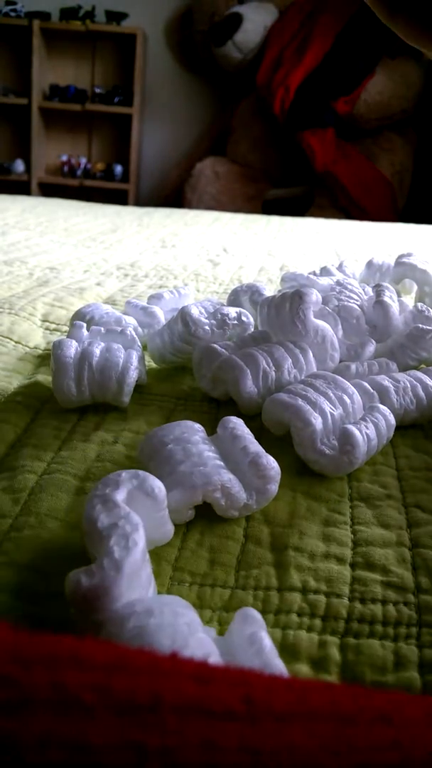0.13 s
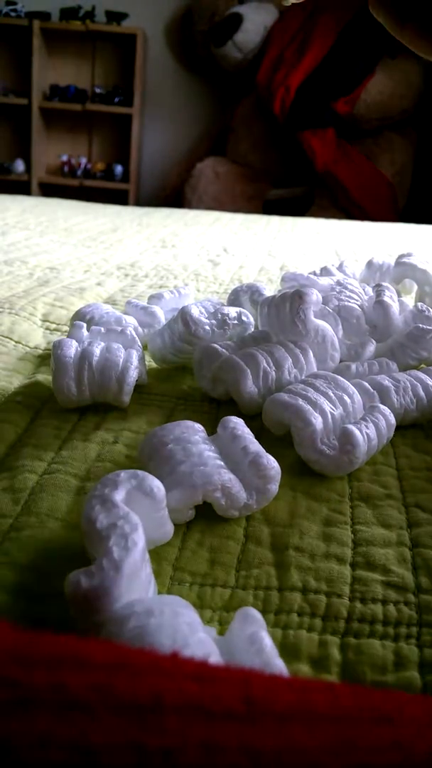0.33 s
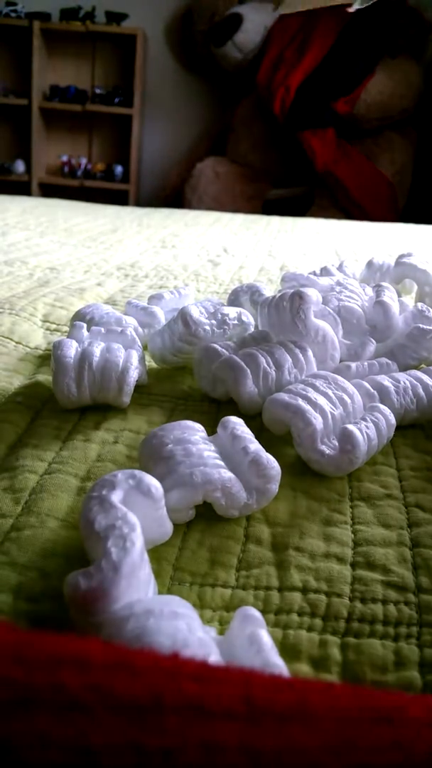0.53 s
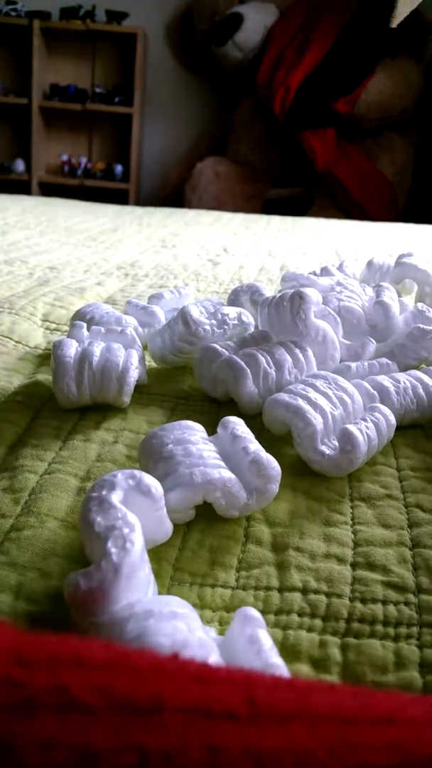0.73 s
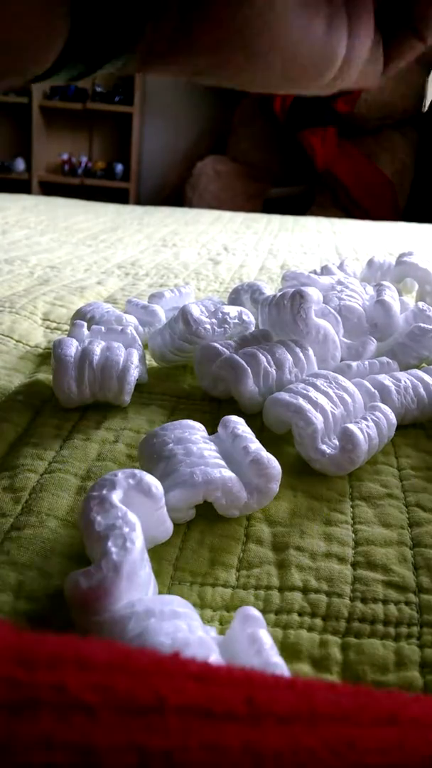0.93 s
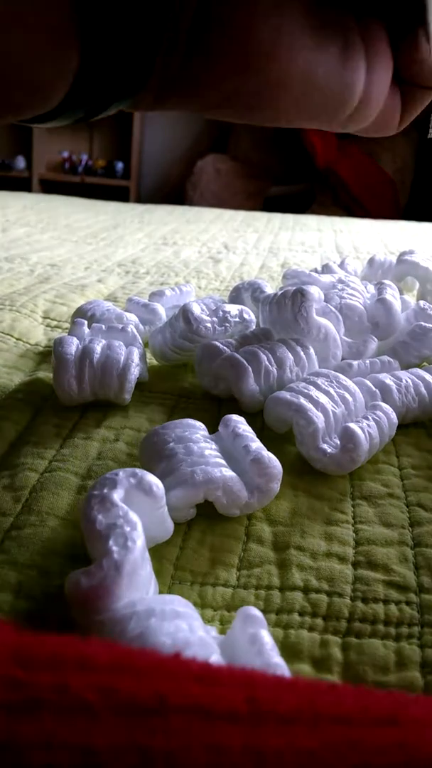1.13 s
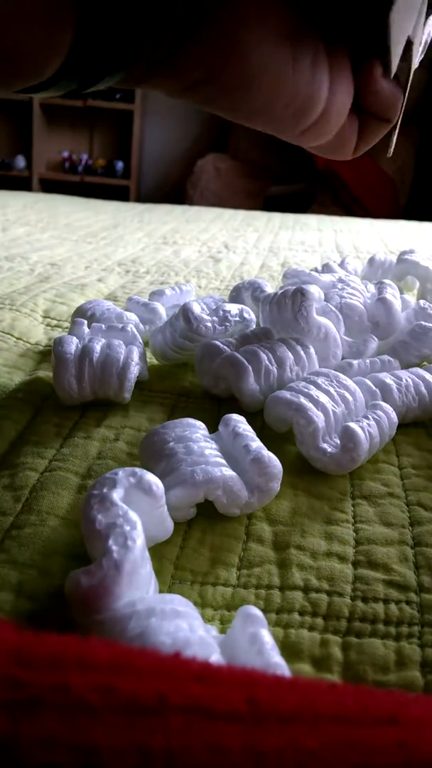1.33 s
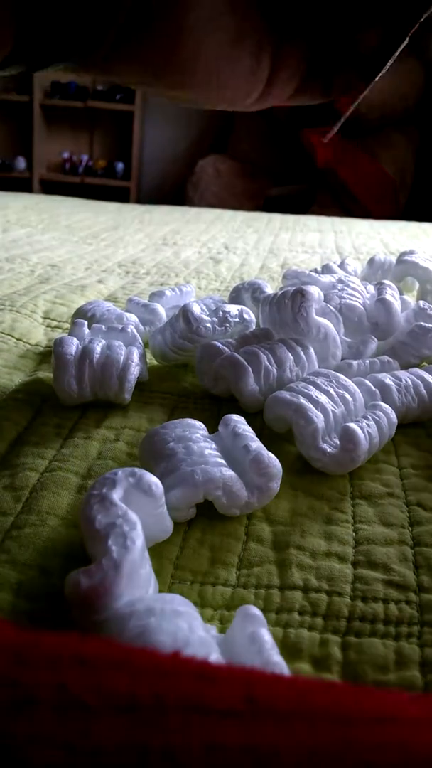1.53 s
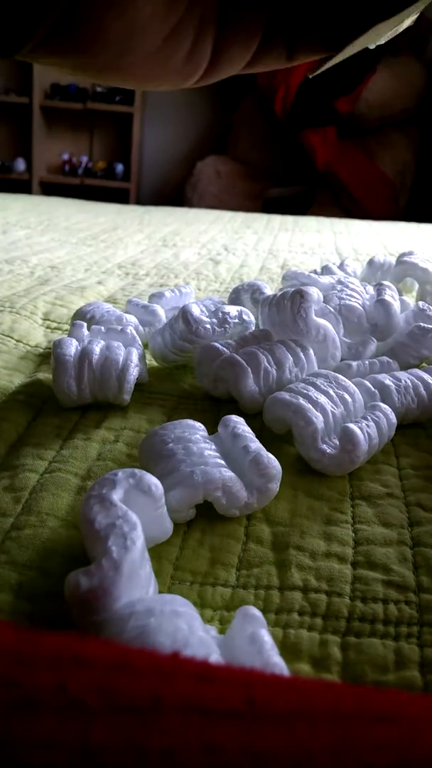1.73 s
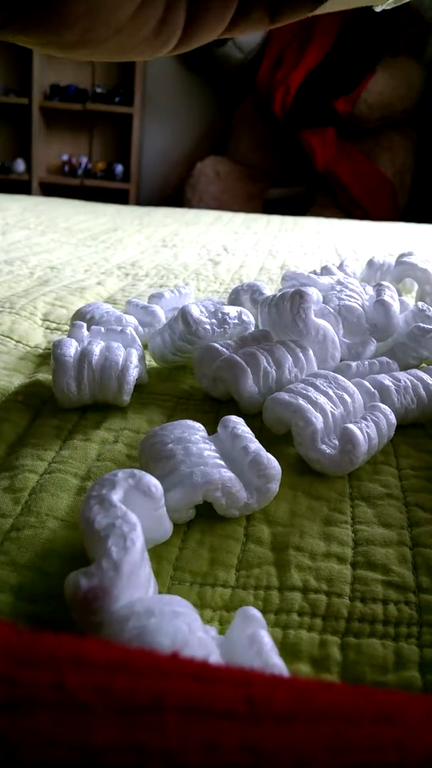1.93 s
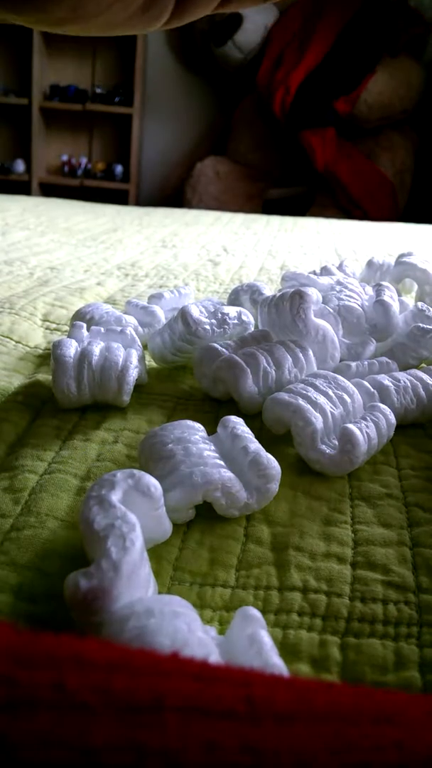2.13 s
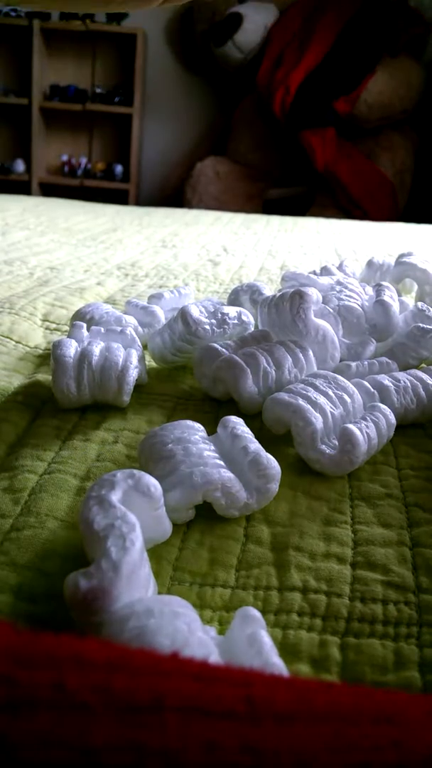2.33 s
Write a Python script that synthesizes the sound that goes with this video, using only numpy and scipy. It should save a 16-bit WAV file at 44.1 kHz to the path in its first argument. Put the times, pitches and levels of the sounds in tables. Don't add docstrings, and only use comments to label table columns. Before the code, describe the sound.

Loose foam packing pieces rustle and crackle under a rubbing hand, with sharp ticks and soft thuds

```python
import sys
import numpy as np
from scipy import signal
from scipy.fft import rfft, irfft, next_fast_len
from scipy.io import wavfile
from scipy.ndimage import uniform_filter1d, minimum_filter1d

SR = 44100
rng = np.random.default_rng(int(sys.argv[2]) if len(sys.argv) > 2 else 0)


def magnitude_from_level(level_db):
    exponent = np.asarray(level_db, float) / 20
    return 10 ** exponent


def unload_audio(sound):
    columns = np.transpose(np.atleast_2d(sound))
    steps = np.round(np.clip(columns, -1, 1) * 32767)
    wavfile.write(sys.argv[1], SR, steps.astype(np.int16))


N = 108045

# hz, level_db
FOAM = [(500, -17), (1500, -15), (3100, -1.5), (4800, -4.5), (6500, -6), (9000, -4), (11500, -0.5),
        (15500, -2)]


def evened(x):
    return x / np.sqrt(np.mean(x ** 2) + 1e-20)


def read(points, hz):
    point_hz, value = np.transpose(points)
    return np.interp(np.log(hz + 1), np.log(point_hz + 1), value)


def peaked(x, hz, q):
    return signal.lfilter(*signal.iirpeak(hz, q, SR), x)


def wander(count, size):
    return evened(uniform_filter1d(rng.standard_normal(count), size=size))


def add(mix, start_s, sound):
    part = mix[:, max(round(start_s * SR), 0):][:, :sound.shape[1]]
    part += sound[:, :part.shape[1]]


def shaped(x, colour, patch_db, size, tilt=((0, 0),)):
    overlap = size * 3 // 4
    hz, t, z = signal.stft(x, SR, nperseg=size, noverlap=overlap)
    patches = uniform_filter1d(rng.standard_normal(z.shape[1:]), size=5, axis=0)
    patches = evened(uniform_filter1d(patches, size=18, axis=1))
    tilt_s, db_per_octave = np.transpose(tilt)
    tilt_db = np.log2(hz / 6000 + 0.14)[:, None] * np.interp(t, tilt_s, db_per_octave)
    colour_db = read(colour, hz)
    z = z * magnitude_from_level(colour_db)[:, None] / np.sqrt(np.mean(magnitude_from_level(2 * colour_db)))
    z = z * magnitude_from_level(tilt_db + patch_db * patches)
    return signal.istft(z, SR, nperseg=size, noverlap=overlap)[1][:, :N]


def hollow(x):
    # centre_hz, width_hz, lift_db
    hollows = [(3700, 520, 1.5), (5500, 1000, 7.5), (6900, 550, 2), (8150, 1800, 4.5), (9000, 590, 1),
               (12000, 4400, -1.5)]
    size = next_fast_len(N)
    hz = np.fft.rfftfreq(size, 1 / SR)
    lift_db = sum(db / (1 + (2 * (hz - f) / width) ** 2) for f, width, db in hollows)
    return irfft(rfft(x, size) * magnitude_from_level(lift_db), size)[:, :N]


def twin(x):
    return x[[0, 0, 1]]


def room():
    # hz, level_db
    room_colour = [(32, -13), (53, 5), (85, -6), (340, 2), (600, -8.5), (950, -15.5), (1200, -20.5),
                   (15500, -51.5)]
    room_db, box_hz, box_q, box_share = -42, 350, 4, .8
    hum_hz, hum_db, hum_pan_db, hum_waver_db = 119.3, -47, -6, 2
    level_db = hum_db + hum_waver_db * wander(N, 4000)
    hum = np.sqrt(2) * magnitude_from_level(level_db) * np.sin(2 * np.pi * hum_hz * np.arange(N) / SR)
    air = shaped(rng.standard_normal((2, N)), room_colour, 3.4, size=2048)
    air = air + box_share * peaked(air, box_hz, box_q)
    return twin(magnitude_from_level(room_db) * air) + hum * magnitude_from_level([[0], [-hum_pan_db], [-99]])


def pushes():
    # start_s, level_db, pitch_hz
    push_events = [
        (0.499, -30.5, 89),
        (1.02, -30, 73.4),
        (1.315, -25.5, 91.5),
        (1.338, -31.5, 72),
        (1.476, -29, 79.6),
        (1.677, -34.5, 89),
    ]
    out, t = np.zeros((3, N)), np.arange(4000) / SR
    for start_s, db, hz in push_events:
        u = np.minimum(t * hz / 1.9, 1)
        swing = np.sin(2 * np.pi * hz * t) * np.sin(np.pi * u ** 2.4)
        add(out, start_s, magnitude_from_level(db) * swing * np.array([[1], [1], [0]]))
    return out


def scuffs():
    # start_s, level_db, pitch_hz, length_s
    scuff_events = [(0.233, -35, 634, 0.034), (0.431, -38, 674, 0.024), (0.493, -42, 800, 0.079),
                    (0.7, -39, 400, 0.084), (.701, -49.5, 840, 0.02), (0.848, -37, 770, 0.075),
                    (0.967, -28.5, 343, 0.083), (1.317, -28, 760, 0.054), (1.639, -33, 880, 0.034),
                    (1.657, -32.5, 900, 0.0097), (1.673, -28.5, 560, 0.038), (1.69, -41.5, 740, 0.02),
                    (1.964, -37.5, 790, 0.018), (1.857, -43, 830, 0.054), (0.635, -44, 700, 0.0041),
                    (.938, -35, 544, 0.014), (2.309, -44.5, 534, 0.045)]
    out, t = np.zeros((2, N)), np.arange(4000) / SR
    for start_s, db, hz, length_s in scuff_events:
        noise = peaked(rng.standard_normal((2, 4000)), hz, 2.2)
        noise = signal.lfilter(*signal.butter(2, 1800, fs=SR), noise)
        u = np.minimum(t / max(length_s, .005), 1)
        add(out, start_s, magnitude_from_level(db) * evened(noise) * np.sin(np.pi * u ** 0.31))
    return twin(out)


def thuds():
    # start_s, peak_db, pitch_hz, left_minus_right_db
    thud_events = [(.092, -31, 277, 7), (.494, -28, 350, 5), (.502, -27, 300, 4), (.536, -25, 280, 5),
                   (.648, -28, 353, 6), (.778, -21, 305, -3), (.973, -19, 210, 4.5), (.984, -24, 320, 4),
                   (1.342, -25, 295, 5), (1.487, -28, 295, 2), (1.543, -31, 339, 5), (1.618, -29, 380, 5.5),
                   (1.745, -22, 361, -2), (1.921, -34, 315, 5), (1.975, -23, 295, -2.5),
                   (2.176, -24, 300, 5.5)]
    level_db, rise_s, cycles = 5.5, .003, 11
    knock_share, knock_ratio, rattle_share = .45, 2.2, .09
    out, t = np.zeros((3, N)), np.arange(4000) / SR
    rattle_band = signal.butter(2, [150, 1100], "band", fs=SR)
    for start_s, db, hz, pan_db in thud_events:
        fall = np.minimum(t / rise_s, 1) * magnitude_from_level(-60 * t * np.sqrt(hz * 300) / cycles)
        knock = np.sin(2 * np.pi * hz * knock_ratio * t)
        body = np.sin(2 * np.pi * hz * t) + knock_share * knock
        rattle = evened(signal.lfilter(*rattle_band, rng.standard_normal((2, 4000))))
        sound = twin(np.array([body, 0 * body]) * fall + rattle_share * rattle * fall ** 0.95)
        right_db = 4 - pan_db / 2
        add(out, start_s + .002, magnitude_from_level(db + level_db) * sound * magnitude_from_level([[pan_db / 2], [right_db], [right_db]]))
    return out


def squeaks():
    # start_s, level_db, pitch_hz, length_s
    squeak_events = [(0.134, -39, 4800, 0.015), (0.21, -33.5, 9360, 0.035), (0.437, -41, 13000, 0.0055),
                     (0.44, -24, 8440, 0.0049), (.443, -39, 13000, .01), (0.666, -40.5, 9500, 0.0064),
                     (0.873, -33.5, 3640, 0.023), (0.977, -41, 3810, .15), (1, -27.5, 9050, 0.095),
                     (1.018, -27, 6750, 0.1), (1.035, -31, 5160, .13), (1.475, -35, 3780, .012),
                     (1.636, -26, 2580, .012), (1.815, -55.5, 3700, 0.17)]
    ring_q, edge_power = 10, .45
    out, t = np.zeros((2, N)), np.arange(8000) / SR
    for start_s, db, hz, length_s in squeak_events:
        u = np.minimum(t / max(length_s, .004), 1)
        pitch_hz = min(hz, 15000)
        ring = peaked(peaked(rng.standard_normal((2, 8000)), pitch_hz, ring_q), pitch_hz, ring_q)
        swell = abs(np.sin(np.pi * u)) ** edge_power * (u < 1)
        add(out, start_s, magnitude_from_level(db) * evened(ring) * swell)
    return twin(out)


def ticks():
    # start_s, peak_db, ring_hz
    tick_events = [(.001, -30, 9000), (.009, -30, 5050), (0.025, -31, 9000), (.036, -20.5, 6340),
                   (.097, -33, 9000), (.109, -34, 12000), (.181, -36, 13000), (.2085, -16, 6500),
                   (.3965, -36, 3900), (0.431, -21.5, 12900), (0.491, -41, 6500), (0.6524, -30, 3380),
                   (0.665, -38, 9600), (.7706, -51, 3700), (0.8255, -41, 3900), (0.839, -40, 3900),
                   (0.975, -23, 11800), (1.092, -13, 9000), (1.206, -36, 3900), (1.2376, -27, 9000),
                   (1.311, -34, 13000), (1.3173, -13.5, 10000), (1.335, -30, 5500), (1.405, -24, 13500),
                   (1.474, -19, 13000), (1.486, -31, 12000), (1.645, -26, 5900), (1.648, -18.5, 2500),
                   (1.659, -34, 2600), (1.7025, -41, 12200), (1.753, -26.5, 13300), (1.79, -36, 9000)]
    level_db, ring_q, rise_s, t60_s = -4, 1.8, .0008, .009
    out, t = np.zeros((2, N)), np.arange(600) / SR
    fall = np.minimum(t / rise_s, 1) * magnitude_from_level(-60 * t / t60_s)
    for start_s, db, hz in tick_events:
        crack = rng.standard_normal((2, 600))
        ring = evened(peaked(crack, min(hz, 15000), ring_q))
        add(out, start_s, magnitude_from_level(db + level_db) * fall * (np.diff(crack, prepend=0) * 1.3 + ring))
    return twin(out)


def snaps():
    # start_s, peak_db, ring_hz, length_s
    snap_events = [(0.094, -64, 6800, 0.0098), (0.209, -27, 9700, 0.021), (0.43, -25, 13500, 0.011),
                   (0.44, -21, 9000, 0.017), (0.486, -33.5, 6240, 0.038), (0.649, -50, 10000, 0.05),
                   (0.817, -28, 3640, 0.079), (0.967, -17.5, 12000, 0.041), (1.233, -38, 3700, 0.018),
                   (1.303, -18.5, 10400, 0.018), (1.314, -19.5, 3620, 0.0054), (1.322, -15, 1440, 0.015),
                   (1.386, -30.5, 9000, 0.024), (1.474, -24.5, 5300, 0.014), (1.477, -15.5, 4500, 0.0033),
                   (1.644, -28, 2800, 0.0061), (1.702, -26.5, 12900, 0.0056), (1.718, -34, 9000, 0.0053),
                   (1.729, -30, 4220, 0.0064), (1.74, -43, 5600, 0.01), (1.773, -34, 9000, 0.021),
                   (1.977, -33.5, 2520, 0.0066), (2.175, -40.5, 3900, 0.006), (2.295, -43, 2820, 0.058)]
    level_db, ring_q, ring_share, skew, patch_db = -11, 3.9, .8, 1.1, 1.8
    out, t = np.zeros((2, N)), np.arange(2600) / SR
    for start_s, db, hz, length_s in snap_events:
        u = np.minimum(t / max(length_s, .002), 1)
        crack_db = 0.83 * np.minimum(rng.exponential(1, 2600), 4)
        cracks = rng.standard_normal((2, 2600)) * magnitude_from_level(crack_db)
        ring = peaked(cracks, min(hz, 15000), ring_q)
        swell = np.sqrt(abs(np.sin(np.pi * u ** skew)))
        add(out, start_s, magnitude_from_level(db + level_db) * swell * (evened(cracks) + ring_share * evened(ring)))
    return twin(hollow(shaped(out, FOAM, patch_db, size=256)))


def rustle():
    # time_s, effort_db, tilt_db_per_octave, weight_db
    rub = [(0, -39, 1, -41), (.08, -52, -1.5, -46.5), (.15, -38, -2, -40), (.23, -37.5, 4.5, -40.5),
           (.4, -48, 0, -49), (.5, -46, 0, -36.5), (.642, -55, -1, -48.5), (.73, -60, -13, -30.5),
           (.8, -46, 2.5, -63.5), (.87, -31, 4, -34.5), (.94, -32, -4.5, -36), (1.04, -20.5, 3.5, -28.5),
           (1.11, -27.5, 1.5, -34), (1.19, -44, -3, -48.5), (1.34, -38.5, -6, -36), (1.7, -44.5, -2.5, -42),
           (2.05, -54.5, -6.5, -46), (2.45, -79.5, 21, -51.5)]
    # hz, level_db
    quilt = [(40, -32.5), (200, -9.5), (340, -2), (600, -9), (950, -11), (1150, -24.5), (1600, -27),
             (2500, -26.5)]
    slips_per_s, slip_spread_db, flicker_db, lump_db = 14000, 1.4, 1.1, 1.5
    rub_db, foam_patch_db, quilt_patch_db = 1, 2.5, 3.72
    time_s, effort_db, tilt_db, weight_db = np.transpose(rub)
    t = np.arange(N) / SR
    sizes = magnitude_from_level(slip_spread_db * np.minimum(rng.exponential(1, N), 3))
    sizes = sizes * (rng.random(N) < slips_per_s / SR)
    slips = evened(sizes * rng.standard_normal((2, N)))
    slips = slips * magnitude_from_level(np.interp(t, time_s, effort_db) + rub_db) * magnitude_from_level(flicker_db * wander(N, 160))
    foam = hollow(shaped(slips, FOAM, foam_patch_db, size=512, tilt=np.transpose([time_s, tilt_db])))
    lumps = magnitude_from_level(lump_db * wander(N, 500))
    drag = rng.standard_normal((2, N)) * lumps * magnitude_from_level(np.interp(t, time_s, weight_db))
    return twin(foam + shaped(drag, quilt, quilt_patch_db, size=1024))


def scene():
    # hz, lead_rad
    phase_lead = [(100, -1.5), (400, -1.57), (560, -1.5), (680, 3.5), (1050, -2.17), (1200, 2),
                  (1750, -1.5), (2450, -3)]
    # hz, left_minus_right_db
    side_db = [(60, -1), (200, 2.5), (650, 8.5), (1050, 3), (1600, 1.1), (5000, 4.5), (9000, 4.5),
               (15000, 9.6)]
    # hz, share_0_to_1
    likeness = [(30, .5), (150, .93), (600, .75), (1500, .6), (2500, .9), (4000, .95), (8000, .8),
                (14000, .5)]
    delay_from_hz, turn_hz, stepped, stepped_to_hz = 2420, 2690, 1.45, 8000
    size = next_fast_len(N + 4096)
    hand = rustle() + snaps() + ticks() + squeaks() + thuds() + pushes() + scuffs()
    left, right, other = rfft(hand + room(), size)
    hz = np.fft.rfftfreq(size, 1 / SR)
    lead = read(phase_lead, hz) - 2 * np.pi * np.maximum(hz - delay_from_hz, 0) / turn_hz
    step_depth = stepped * np.clip(hz / turn_hz - .2, 0, 1) * np.exp(-(hz / stepped_to_hz) ** 2)
    lead = lead - step_depth * np.sin(2 * lead) / 2
    same = np.clip(read(likeness, hz), 0, 1)
    right = same * right * np.exp(1j * lead) + np.sqrt(1 - same ** 2) * other
    right = right / magnitude_from_level(read(side_db, hz))
    return irfft(np.array([left, right]), size)[:, :N]


def thinned(stereo):
    band_edges_hz = [2067, 2325, 2584, 2842, 3100, 3445, 3790, 4220, 4651, 5168, 5685, 6288, 6891, 7579,
                     8269]
    drop_limits_db = [9.5, 0, 0, 8, 1.5, 0, 2, 12, 6.5, 6.5, 12, 12, 14, 6.5]
    wander_db, top_drift_db_per_s, top_hz, offset = 2.6, 5, 15650, 644
    low_sharp_db, sharp_db, sharp_from_hz = 9.3, 7.3, 3000
    padded = np.pad(stereo, ((0, 0), (offset, 0)))
    pair = np.array([padded[0] + padded[1], padded[0] - padded[1]]) / 2
    hz, t, z = signal.stft(pair, SR, "cosine", nperseg=2048)
    edge = np.diff(padded[0], prepend=0) ** 2
    sudden = uniform_filter1d(edge, size=256) / (uniform_filter1d(edge, size=2048) + 1e-14)
    frame_at = np.minimum((t * SR).astype(int), N - 1)
    peak = -minimum_filter1d(-sudden, size=1024)[frame_at] * 1.6
    keep = np.ones(z.shape) * (hz < top_hz)[:, None]
    for lo, hi, limit_db in zip(band_edges_hz, band_edges_hz[1:], drop_limits_db):
        inside = (hz >= lo) & (hz < hi)
        power_db = 10 * np.log10((abs(z[:, inside]) ** 2).sum(1) + 1e-20)
        drift_db = top_drift_db_per_s * (t - 1) * (hi == band_edges_hz[-1])
        needed_db = np.maximum(limit_db + wander_db * wander(len(t), 3) + drift_db, 0)
        weak = power_db[::-1] - power_db > needed_db
        calm = peak < magnitude_from_level(2 * (sharp_db if lo > sharp_from_hz else low_sharp_db))
        keep[:, inside] = ~(weak & calm)[:, None]
    mid, side = signal.istft(z * keep, SR, "cosine", nperseg=2048)[1][:, offset:offset + N]
    return np.array([mid + side, mid - side])


def roll_off(x):
    return signal.sosfilt(signal.butter(12, 15780, fs=SR, output="sos"), x)


def record(dry):
    headroom = .85
    mix = thinned(headroom * np.tanh(dry / headroom))
    return roll_off(mix)


dry = scene()
out = record(dry)
unload_audio(out)
```